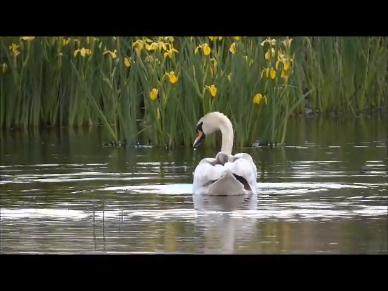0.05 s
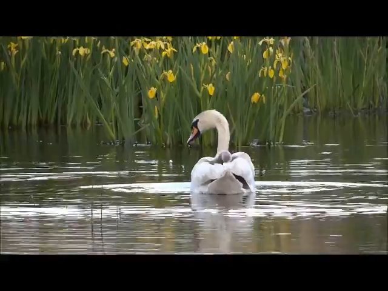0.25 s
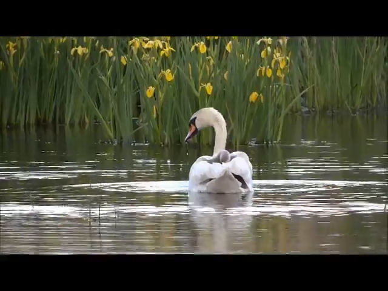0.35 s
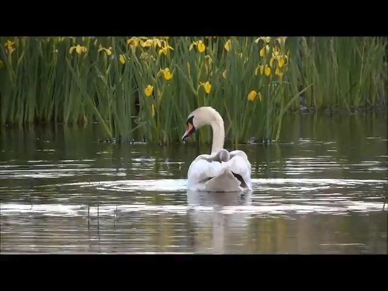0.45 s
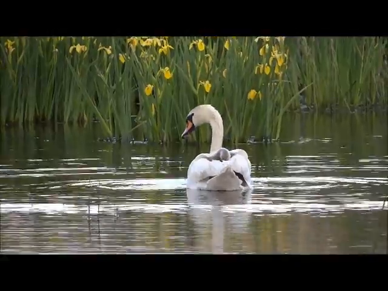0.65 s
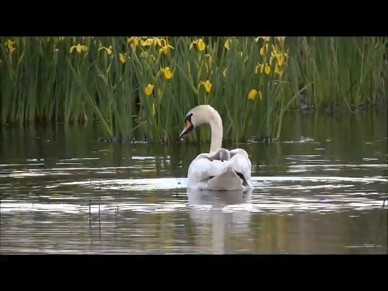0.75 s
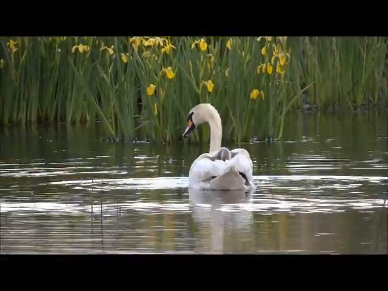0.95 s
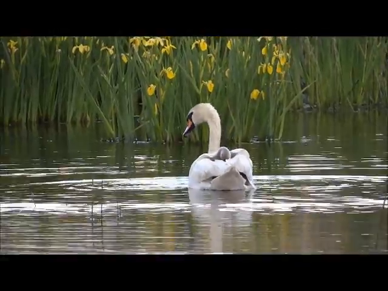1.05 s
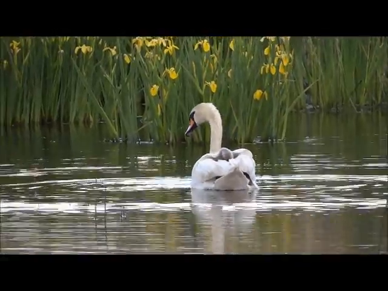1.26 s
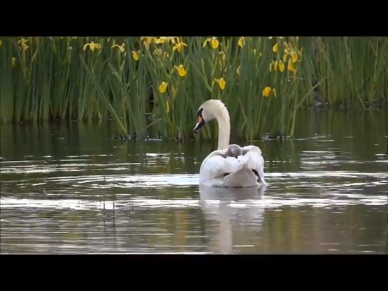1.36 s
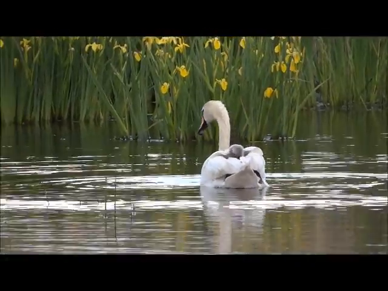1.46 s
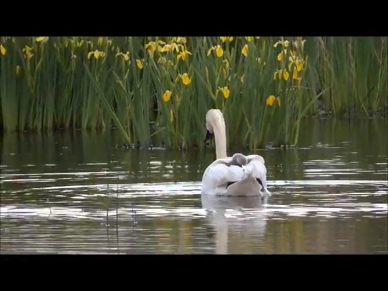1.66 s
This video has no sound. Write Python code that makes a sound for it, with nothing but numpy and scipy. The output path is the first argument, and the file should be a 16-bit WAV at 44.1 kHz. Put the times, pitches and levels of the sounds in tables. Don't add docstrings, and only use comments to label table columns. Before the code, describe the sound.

On a quiet reed pond, a swan puffs out one sharp, breathy snort close to the start. High birdsong follows, with faint far whistles; the handheld microphone picks up hiss, small ticks and rubs near the end.

```python
import sys
import numpy as np
from scipy import signal
from scipy.fft import rfft, irfft
from scipy.io import wavfile
from scipy.ndimage import uniform_filter1d

SR = 44100
rng = np.random.default_rng(int(sys.argv[2]) if len(sys.argv) > 2 else 0)


def master_out(mix):
    frames = np.transpose(np.atleast_2d(mix))
    ceiling = np.clip(frames, -1, 1)
    pcm = np.round(ceiling * 32767).astype(np.int16)
    wavfile.write(sys.argv[1], SR, pcm)


def amplitude_ratio(level_db):
    exponent = np.asarray(level_db, float) / 20
    return 10 ** exponent


N = 74970


def evened(x):
    return x / np.sqrt(np.mean(x ** 2) + 1e-20)


def read(points, hz):
    f, value = np.transpose(points)
    return np.interp(np.log(hz + 1), np.log(f + 1), value)


def add(mix, start_s, sound):
    part = mix[round(start_s * SR):][:len(sound)]
    part += sound[:len(part)]


def tone(pitch_hz):
    return np.sqrt(2) * np.sin(2 * np.pi * np.cumsum(pitch_hz) / SR)


def resonate(x, hz, width_hz):
    turn = np.exp(2j * np.pi * np.cumsum(hz * np.ones(len(x))) / SR)
    r = np.exp(-np.pi * width_hz / SR)
    return 2 * (turn * signal.lfilter([1 - r], [1, -r], x / turn)).real


def tinted(x, table, lowest_hz):
    hz = np.fft.rfftfreq(len(x), 1 / SR)
    low_cut = np.sqrt(1 + (lowest_hz / (hz + 1)) ** 10)
    return evened(irfft(rfft(x) * amplitude_ratio(read(table, hz)) / low_cut, len(x)))


def struck(t, level_db, t60_s):
    strike_s = 0.00082
    return amplitude_ratio(level_db - 60 * t / t60_s) * (1 - np.exp(-t / strike_s))


# [f/Hz, density/dB per Hz]
AIR_COLOUR = [(25, -4), (90, -6), (200, -5.5), (370, -9.5), (550, -8.5), (2000, -15.5), (5000, -24),
              (16000, -32.5)]
# [f/Hz, side over mid/dB]
AIR_WIDTH = [(60, -16), (180, -4), (550, 0), (1650, -1.5), (4000, -4), (9000, -5)]


def air():
    level_db, settle_db, patch_db = -50.5, 1, 1.6
    frames, hz = N // 256 + 5, np.fft.rfftfreq(1024, 1 / SR)
    a, b, c, d, patches = rng.standard_normal((frames, 513, 5)).T
    patches = uniform_filter1d(patches, size=6, axis=0)
    patches = evened(uniform_filter1d(patches, size=14, axis=1))
    mid = a + 1j * b
    side = (c + 1j * d) * amplitude_ratio(read(AIR_WIDTH, hz))[:, None]
    settle = settle_db * np.cos(np.pi * np.arange(frames) * 256 / SR)
    drift_db = (patch_db * patches + settle) * (hz < 5000)[:, None]
    z = np.array([mid + side, mid - side]) * amplitude_ratio(read(AIR_COLOUR, hz)[:, None] + drift_db)
    x = signal.istft(z, nperseg=1024, noverlap=768)[1][:, :N]
    return amplitude_ratio(level_db) * x / np.std(x.mean(0))


# [t/s, length/s, level/dB, f/Hz]
HAND_RUBS = [
    (0, 0.056, -50, 440),
    (0, 0.076, -51, 1300),
    (1.27, 0.23, -52, 2040),
    (1.445, 0.02, -46, 191),
    (1.458, 0.034, -44, 64),
    (1.419, 0.045, -43, 453),
    (1.454, 0.11, -59, 1700),
    (1.595, 0.072, -50.5, 167),
]


def hand_rubs():
    out = np.zeros(N)
    for start_s, length_s, level_db, hz in HAND_RUBS:
        u = np.arange(0, length_s, 1 / SR) / length_s
        noise, grip = rng.standard_normal((2, SR // 4))[:, :len(u)]
        scrape = noise * amplitude_ratio(4.5 * evened(uniform_filter1d(grip, size=150)))
        swell = np.sqrt(np.sin(np.pi * u ** 0.51))
        add(out, start_s, amplitude_ratio(level_db) * swell * evened(resonate(scrape, hz, 0.3 * hz)))
    return out


# [t/s, thump level/dB, shell level/dB, latch level/dB, crack level/dB]
CAMERA_TICKS = [(0.0195, -51.5, -33, -33.5, -45), (0.19, -41.5, -44.5, -53, -45),
                (1.219, -54, -75, -52.5, -67), (1.282, -53, -38, -49.5, -32.5),
                (1.291, -57, -64, -52, -41.5), (1.304, -48, -62, -65, -41), (1.3625, -64, -37, -43.5, -64),
                (1.416, -39.5, -27.5, -29.5, -32), (1.443, -43, -28, -46.5, -60),
                (1.601, -40, -42.5, -46.5, -43), (1.681, -49, -31, -44, -36.5), (1.687, -65, -55, -43, -38)]
# [f/Hz, level/dB, t60/s]
THUMP_MODES = [(80, -12.5, 0.057), (184.8, -5.5, 0.052), (444, -14.5, 0.026)]
# [f/Hz, level/dB, t60/s]
SHELL_MODES = [(768, -13, 0.024), (1145, -8, 0.016), (1612, -15.5, 0.019)]
# [f/Hz, level/dB, t60/s]
LATCH_MODES = [(2350, 2, 0.0083), (2700, 2.5, 0.013), (3400, -15, 0.017)]
# [f/Hz, level/dB]
CRACK_COLOUR = [(500, 10), (2000, -3), (4500, 2.5), (6300, -4), (8000, -11), (11000, -12.5), (13500, -10.5),
                (16000, -25)]


def camera_ticks():
    crack_t60_s, detune = 0.013, 0.012
    t, out = np.arange(SR // 6) / SR, np.zeros(N)
    for start_s, *levels_db, crack_db in CAMERA_TICKS:
        crack = tinted(rng.standard_normal(len(t)), CRACK_COLOUR, 560)
        tick = struck(t, crack_db + 6.5, crack_t60_s) * crack
        for db, modes in zip(levels_db, (THUMP_MODES, SHELL_MODES, LATCH_MODES)):
            for hz, mode_db, t60_s in modes:
                shift, phase = rng.standard_normal(2)
                angle = 2 * np.pi * hz * (1 + detune * shift) * t + phase * (hz > 600)
                tick = tick + struck(t, db + mode_db, t60_s) * 4 * np.sin(angle)
        add(out, start_s, tick)
    return out


# [t/s, length/s, from f/Hz, to f/Hz, level/dB]
FAR_WHISTLES = [(0.083, 0.037, 3170, 3770, -49.5), (0.112, .018, 4350, 5250, -50.5),
                (0.148, 0.029, 3700, 2774, -50), (.505, 0.025, 5650, 5650, -60),
                (.53, 0.065, 3605, 4040, -58), (0.569, 0.025, 2350, 2350, -52),
                (0.689, 0.025, 2384, 2280, -54), (0.718, 0.106, 1214, 1236, -56.5),
                (0.843, 0.019, 1400, 1380, -52.5), (0.864, 0.18, 4530, 4200, -65.5),
                (1.03, 0.014, 4750, 5170, -55), (1.083, 0.032, 4300, 2780, -50),
                (1.096, 0.016, 4300, 2700, -71), (1.149, 0.075, 1373, 1383, -60),
                (1.174, 0.036, 3500, 4400, -54.5), (1.188, 0.061, 3490, 4090, -58.5),
                (1.209, 0.091, 4350, 4420, -56)]


def far_whistles():
    blur_hz, fuzz, fuzz_per_s = 347, 0.35, 4
    out = np.zeros(N)
    for start_s, length_s, from_hz, to_hz, level_db in FAR_WHISTLES:
        u = np.arange(0, length_s, 1 / SR) / length_s
        pitch = from_hz + (to_hz - from_hz) * u
        noise = rng.standard_normal(SR // 4)[:len(u)]
        blurred = evened(resonate(noise, pitch, blur_hz * pitch.mean() / 4000))
        blur = min(fuzz + fuzz_per_s * length_s, 1)
        whistle = (1 - blur) * tone(pitch) + blur * blurred
        add(out, start_s, amplitude_ratio(level_db) * np.sqrt(np.sin(np.pi * u)) * whistle)
    return out


# [f/Hz, t60/s]
BANK_DECAY = [(500, 0.3), (2000, 0.45), (6000, 0.28), (14000, 0.12)]


def banks(x):
    delay_s, spacing = 0.004, 20
    slots = np.arange(round(delay_s * SR), SR // 2, spacing)
    taps = np.zeros((2, SR // 2 + spacing))
    draw = rng.random((2, SR // 20, 2))[:, :len(slots)]
    places = slots + (draw[..., 0] * spacing).astype(int)
    np.put_along_axis(taps, places, np.sign(draw[..., 1] - 0.5), 1)
    hz, t, z = signal.stft(taps, SR, nperseg=256)
    decay = amplitude_ratio(-60 * t / read(BANK_DECAY, hz)[:, None])
    tail = signal.istft(z * decay, SR, nperseg=256)[1]
    tail = tail + 0.5 * tail[::-1]
    return signal.fftconvolve(x[None], tail / np.linalg.norm(tail[0]), axes=1)[:, :N]


# [t/s, level/dB, fade/dB per s, lowest f/Hz, ring f/Hz]
SNORT_PUFFS = [
    (0.212, -33, 398, 4000, 5900),
    (0.2249, -28, 395, 1140, 1560),
    (.2385, -22.5, 312, 1140, 2500),
    (.2836, -24, 279, 600, 1500),
    (.308, -26.5, 288, 610, 2700),
    (0.319, -30, 248, 605, 3400),
]
# [f/Hz, density/dB per Hz]
PINCHED = [(290, -57), (500, -25), (659, -5), (2100, -10), (2430, -8), (4400, -3.5), (11300, -15),
           (16000, -26)]
# [f/Hz, density/dB per Hz]
FLARED = [(500, -24), (740, -6), (1900, -8), (3300, -6), (5500, -7.5), (9100, -7), (12000, -13),
          (16000, -22)]


def swan():
    rise_s, flutter_s, flutter_db = 0.0018, 0.00055, 2.4
    burst_db, burst_s, second_breath_s = 4, 0.0066, 0.26
    ring_db, ring_fade_db_per_s, ring_width_hz = -5.5, 455, 350
    chest_db, leak_top_hz = -32, 7200
    t, out = np.arange(SR // 4) / SR, np.zeros(N)
    for i, (start_s, level_db, fade, lowest_hz, ring_hz) in enumerate(SNORT_PUFFS):
        jet, wobble, chest = rng.standard_normal((3, len(t)))
        flutter = evened(signal.lfilter([1], [1, -np.exp(-1 / (flutter_s * SR))], wobble))
        flow = tinted(jet, PINCHED if start_s < second_breath_s else FLARED, lowest_hz)
        if i == 0:
            flow = signal.sosfilt(signal.butter(4, leak_top_hz, fs=SR, output="sos"), flow)
        ring = resonate(jet, ring_hz, ring_width_hz)
        ring = evened(resonate(ring, ring_hz, ring_width_hz))
        puff = flow + amplitude_ratio(ring_db - ring_fade_db_per_s * t) * ring
        puff = puff + amplitude_ratio(chest_db) * evened(resonate(chest, 310, 270))
        envelope_db = level_db - fade * t + flutter_db * flutter + burst_db * np.exp(-t / burst_s)
        add(out, start_s, puff * amplitude_ratio(envelope_db) * np.minimum(t / rise_s, 1))
    return out


# [peak t/s, peak f/Hz, level/dB]
WARBLER_NOTES = [
    (.502, 3770, -47),
    (.621, 3810, -49.5),
    (.741, 3795, -49),
    (.858, 3790, -49.5),
]


def warbler():
    climb_s, drop_s, climb_hz_per_s, drop_hz_per_s = 0.019, 0.012, 57000, 66600
    catch_depth, catch_s = 0.98, 0.0015
    t, out = np.arange(-climb_s, drop_s, 1 / SR), np.zeros(N)
    swell = np.sin(np.pi * (t + climb_s) / (climb_s + drop_s)) ** 0.36
    shape = swell * (1 - catch_depth * np.exp(-(t / catch_s) ** 2))
    for peak_s, peak_hz, level_db in WARBLER_NOTES:
        pitch = peak_hz + np.where(t < 0, climb_hz_per_s, -drop_hz_per_s) * t
        add(out, peak_s - climb_s, amplitude_ratio(level_db) * shape * tone(pitch))
    return out


# [t/s, level/dB, f/Hz]
SPRING_PINGS = [
    (1.174, -62, 14300),
    (1.281, -45, 10650),
    (1.305, -45, 13400),
    (1.306, -58, 7600),
    (1.478, -54, 14500),
    (1.682, -37, 6230),
]


def spring_pings():
    t, out = np.arange(SR // 6) / SR, np.zeros(N)
    for start_s, level_db, hz in SPRING_PINGS:
        add(out, start_s, struck(t, level_db, 0.011) * 3 * np.sin(2 * np.pi * hz * t))
    return out


def placed(x, share, below_hz):
    port_lag = 0.17
    side = share * signal.sosfilt(signal.butter(2, below_hz, fs=SR, output="sos"), x)
    side = side + np.sign(share) * port_lag * (np.roll(x, -1) - np.roll(x, 1))
    return np.array([x + side, x - side])


def narrowed(x):
    edge_hz, sway_hz, open_rise_db, loud_side_db = 7600, 1300, 5.5, 0
    mid, side = (x[0] + x[1]) / 2, (x[0] - x[1]) / 2
    hz, t, z = signal.stft(np.array([mid, side]), SR, nperseg=1024)
    treble_db = 10 * np.log10((abs(z[0, hz > 5000]) ** 2).sum(0) + 1e-15)
    sharp = np.diff(treble_db, prepend=treble_db[0]) > open_rise_db
    sway = np.repeat(rng.standard_normal(len(t)), 2)[:len(t)]
    hz = hz[:, None]
    keep = (hz < edge_hz + sway_hz * sway) | sharp | np.roll(sharp, 1)
    loud = (treble_db > np.median(treble_db) + 15) & (hz > 8000) & (hz < 11500)
    gain = np.maximum(keep, loud * amplitude_ratio(loud_side_db)) * amplitude_ratio(-9 * (hz > 11500))
    side = signal.istft(z[1] * gain, SR, nperseg=1024)[1][:N]
    return np.array([mid + side, mid - side])


def scene():
    swan_wet_db, bird_wet_db = -8, -7
    bed = air()
    camera = hand_rubs() + camera_ticks() + spring_pings()
    song = far_whistles() + warbler()
    snort = swan()
    wet = banks(amplitude_ratio(swan_wet_db) * snort + amplitude_ratio(bird_wet_db) * song)
    direct = placed(snort, 0.22, 5000) + placed(song, -0.36, 9200) + placed(camera, -0.11, 9000)
    return direct + wet + bed


def roll_off(x):
    return signal.sosfilt(signal.butter(12, 16460, fs=SR, output="sos"), x)


def record(dry):
    edge_hz = 16000
    low_pass = signal.firwin(255, edge_hz, window=("kaiser", 8), fs=SR)
    mix = signal.oaconvolve(narrowed(dry), low_pass[None], "same")
    return roll_off(mix)


dry = scene()
out = record(dry)
master_out(out)
```